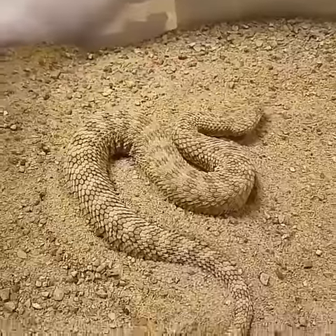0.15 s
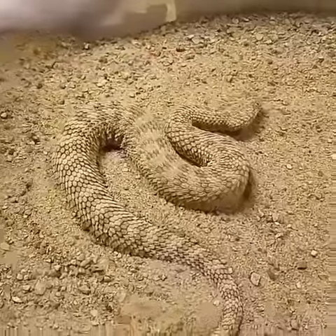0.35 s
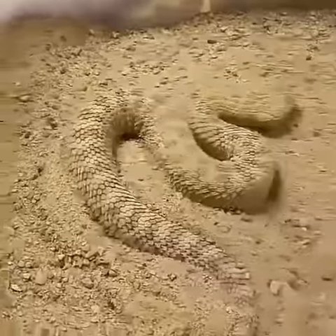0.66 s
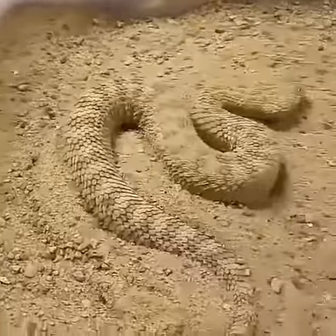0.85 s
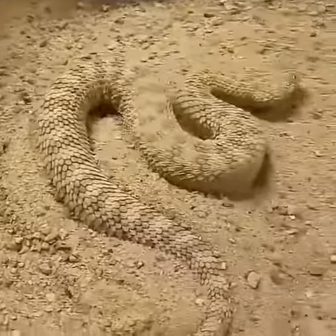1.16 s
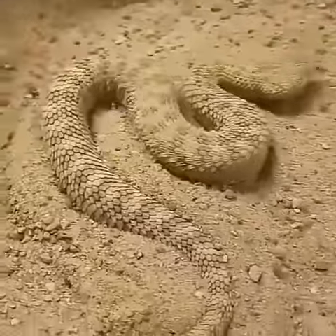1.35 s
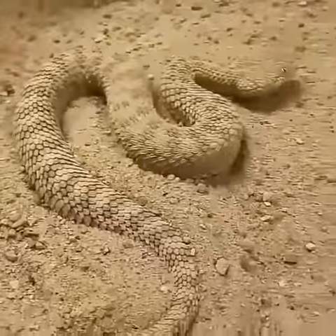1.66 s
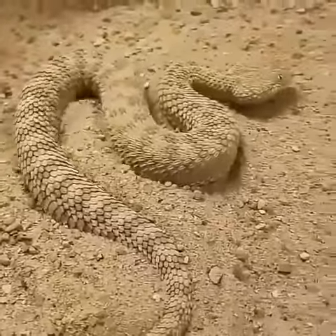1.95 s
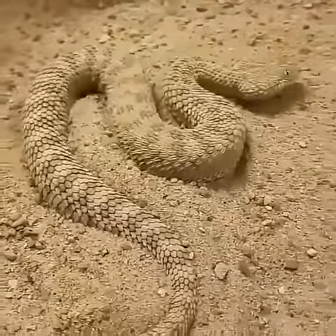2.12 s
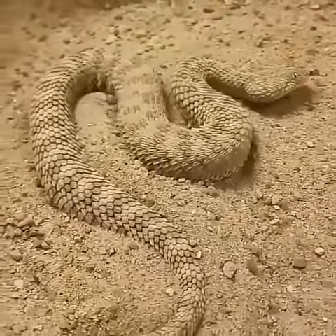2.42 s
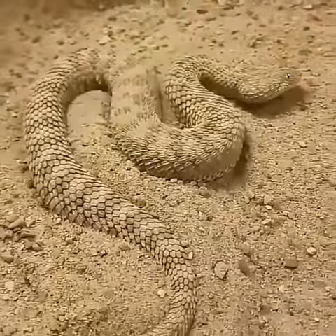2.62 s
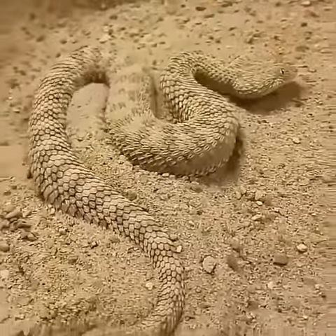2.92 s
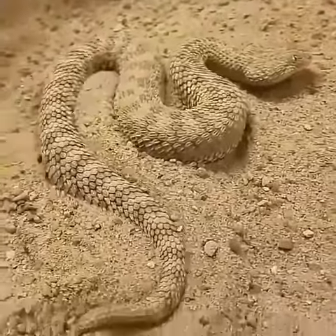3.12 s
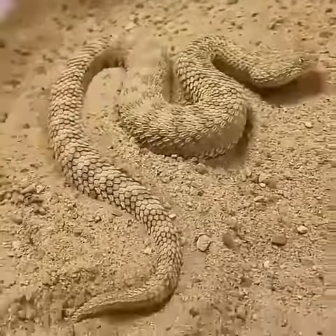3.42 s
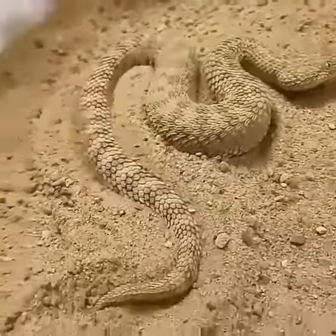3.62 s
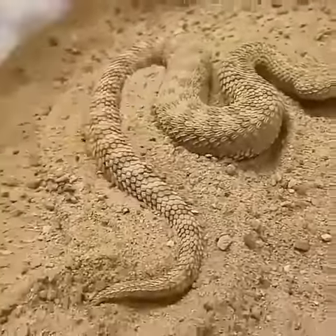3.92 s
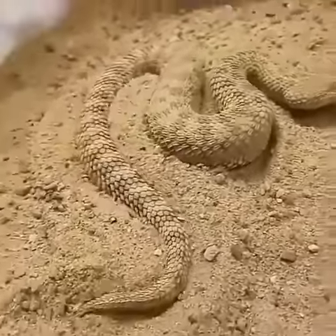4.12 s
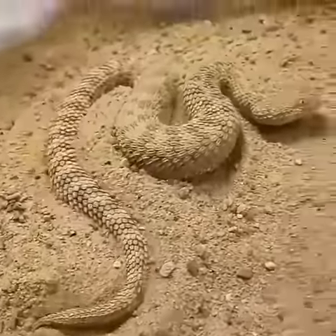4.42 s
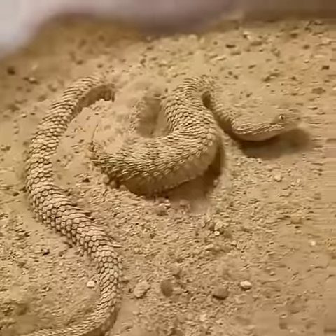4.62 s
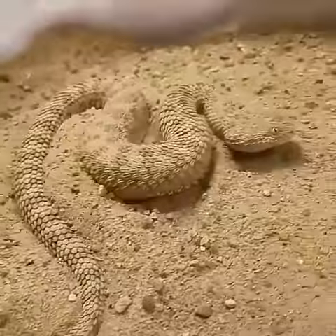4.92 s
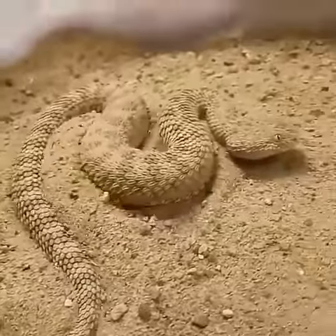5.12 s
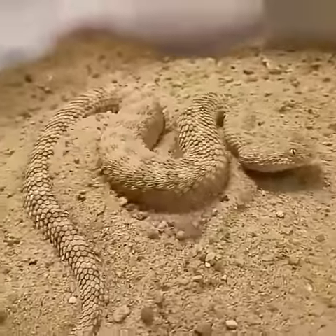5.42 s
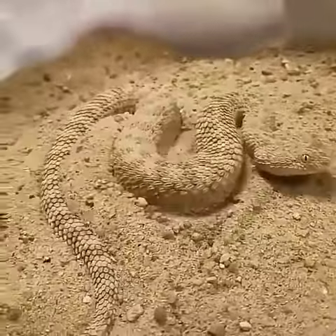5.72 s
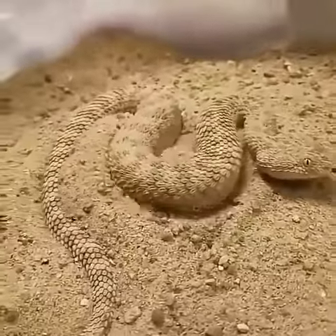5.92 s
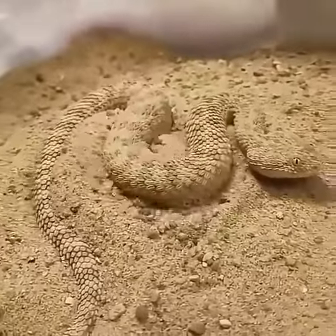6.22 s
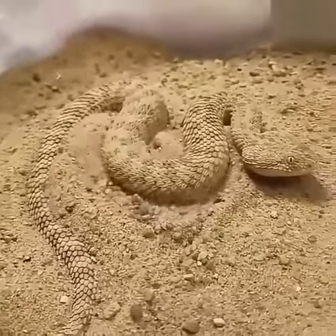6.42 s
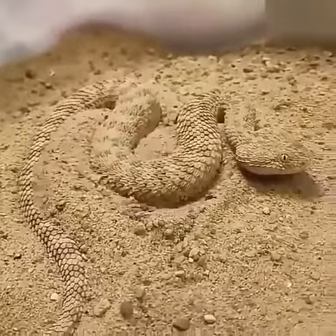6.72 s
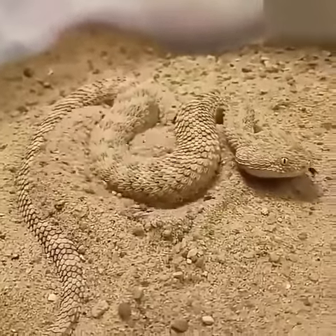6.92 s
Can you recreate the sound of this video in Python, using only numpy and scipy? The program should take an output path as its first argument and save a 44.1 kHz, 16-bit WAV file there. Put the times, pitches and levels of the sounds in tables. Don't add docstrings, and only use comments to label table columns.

```python
import sys
import numpy as np
from scipy import signal
from scipy.fft import rfft, irfft, next_fast_len
from scipy.io import wavfile
from scipy.ndimage import uniform_filter1d

SR = 44100
rng = np.random.default_rng(int(sys.argv[2]) if len(sys.argv) > 2 else 0)


def nominal_scale(level):
    x = np.asarray(level, float) / 20
    return 10 ** x


def master(y):
    cut = np.clip(np.atleast_2d(y).T, -1, 1)
    pcm = np.round(cut * 32767)
    wavfile.write(sys.argv[1], SR, pcm.astype(np.int16))


N = 311346

# frequency in Hz, gain in dB.
CASING_COLOUR = [(130, -43.5), (220, 3), (266, -1.5), (422, 1), (615, -3.5), (911, -2), (1500, -11),
                 (2070, -11), (3710, -19), (4880, -10.5), (6310, -12.5), (7880, -23.5), (12100, -21),
                 (13200, -19.5)]
# start in seconds, length in seconds, scrape in dB, weight and speed in dB against the scrape.
DRAGS = [(.428, 0.084, -49, -9, -8.5), (.688, 0.021, -50, -9, -10.5), (.918, 0.21, -49, -2, 4),
         (1.24, 0.091, -44, 1, 0), (1.335, 0.096, -51.5, 8, 0.5), (1.586, 0.098, -41.5, 7, -3),
         (1.846, 0.054, -43.5, 6.5, -1), (1.985, .02, -68, 8, -2), (2.912, 0.023, -65.5, 2, 2),
         (2.962, 0.032, -59.5, -11, 0.5), (3.71, 0.12, -55.5, -9, 3.5), (4.187, 0.059, -44.5, 0, 2),
         (4.21, 0.044, -42.5, 4.5, 4.5), (4.264, 0.011, -44, -2, -24), (4.28, 0.12, -55.5, -1.5, -2.5),
         (4.654, 0.041, -62.5, 12.5, -8)]
SWELLS = [(.52, 0.12, -47, -13, -8.5), (.73, .175, -50.5, -4.5, 0.5), (1.17, 0.025, -50, 2, 8.5),
          (1.43, 0.092, -48, 10, -2), (1.475, 0.033, -53.5, 6, 6.5), (1.72, 0.088, -60, 0, -1.5),
          (1.865, .11, -45.5, -7, 2.5), (3.0, 0.044, -64, 5, 6), (3.09, 0.065, -61, -4, 3),
          (3.52, 0.22, -57, -2, -12), (3.81, 0.066, -57.5, -4, 8.5), (3.82, 0.15, -51.5, -7, -5),
          (4.39, 0.065, -55.5, 1, -5.5), (4.455, .055, -54.5, 4, -5.5), (5.14, 0.22, -72.5, 11, 5.5),
          (5.42, .05, -70, 0, 9), (5.78, 0.056, -69.5, -3, 5)]
SHOVES = [
    (.655, 0.027, -60, 5, -2),
    (.99, .25, -47, 0.5, -1),
    (1.5, 0.091, -39, 5.5, -2.5),
    (1.82, 0.027, -64, 0, 5),
    (3.18, 0.063, -69, 0, 3),
    (3.6, 0.118, -53, -2.5, 1),
    (3.97, 0.16, -60.5, -4, -4),
    (4.13, 0.075, -50.5, 3.5, -1),
    (4.53, 0.097, -56, -2.5, -17),
    (4.69, 0.05, -60.5, 7.5, -8),
]
# share of the length before the top, start in dB and end in dB under the top.
DRAG_SHAPE = (0.11, -8.5, -4)
SWELL_SHAPE = (0.53, -5.5, -11)
SHOVE_SHAPE = (0.68, -15, -1.4)
# start in seconds, peak in dB, ring in Hz, 60 dB decay in seconds.
KNOCKS = [(.2405, -51, 785, .0094), (0.253, -44, 497, .009), (0.4154, -37, 328, .012),
          (0.4274, -30, 350, .006), (0.6816, -22, 880, 0.0023), (0.6834, -29.5, 350, 0.014),
          (.6925, -35.5, 755, 0.0087), (0.7533, -33.5, 340, 0.011), (1.8472, -22.5, 283, 0.024),
          (2.9555, -27, 510, 0.0031), (3.249, -40.5, 720, 0.005), (3.5955, -38, 700, 0.0042),
          (3.853, -39, 410, .01), (3.8709, -36, 710, 0.0067), (4.259, -21.5, 402, 0.0064),
          (4.4156, -39, 600, .008), (4.4487, -32, 347, 0.0082), (4.5063, -33, 497, 0.0076),
          (4.6371, -29.5, 840, 0.0096)]
# start in seconds, peak in dB, ring in Hz, 60 dB decay in
# seconds.
BUMPS = [(0.424, -34, 150, 0.043), (0.681, -39, 103, 0.063), (1.558, -42, 45, .11),
         (1.942, -33.5, 71.4, 0.1), (2.9549, -28.5, 106, .038), (3.2486, -34.5, 126, 0.019),
         (4.2604, -21.5, 114, 0.043), (4.448, -32, 95, 0.068), (4.497, -51, 60, .043),
         (4.638, -34.5, 97, 0.027), (5.249, -47, 100, .05), (6.078, -41, 98, 0.046),
         (6.3039, -29, 130, 0.025), (6.919, -38, 122, 0.05)]
# start in seconds, peak in dB, ring in Hz, 60 dB decay in seconds.
SLAPS = [
    (0.4188, -16, 783, 0.0047),
    (.4204, -30, 363, .008),
]
# frequency in Hz, level in dB against the blow, 60 dB decay in seconds.
WALL_MODES = [(1460, -27, 0.0019), (1966, -10.5, 0.0094), (2540, -21, 0.0054), (3250, -25, 0.0046),
              (4620, -24.5, 0.011), (7160, -53, 0.0061), (11000, -46, .003)]
# middle in seconds, reach in seconds, level in dB.
SWAYS = [
    (1.6, .12, -67),
    (2.42, .2, -54),
    (3.13, .15, -58),
    (3.52, .2, -53),
    (3.86, .15, -50),
    (4.2, 0.36, -51.5),
    (4.52, 0.19, -45),
    (5.55, .3, -53),
    (6.6, 1.2, -61.5),
]
# time in seconds, level of the hum in dB.
PORT_OPENING = [
    (0.0, -54.5),
    (0.98, -61.5),
    (1.27, -57),
    (1.37, -44.5),
    (1.51, -49),
    (4.46, -47.5),
    (6.43, -48.5),
    (6.51, -48),
    (6.62, -49),
    (7.06, -48),
]
# frequency in Hz, width in Hz, level in dB against the hum, steady share from 0 to 1.
MOTOR_LINES = [(118.2, 6.4, -10.5, 0.87), (198.5, 9.4, 0, 0.97), (248.5, 15, -13, 0.44),
               (269, 20, -6.5, 0.94), (404, 18.5, -14.5, 0.19), (463, 6, -19.5, 0.37),
               (175.7, 16, -16.5, 0), (571, 5.2, -29.5, 0.4), (634, 6.3, -24, 0.91)]
# frequency in Hz, gain in dB.
ROOM_SPECTRUM = [(15, -50), (25, -16.5), (146, -10), (199, -4), (275, 1), (344, -11.5), (637, -19),
                 (1500, -34), (1950, -39), (3300, -120)]
# frequency in Hz, gain in dB.
HISS_SPECTRUM = [(530, -8), (900, -2), (1180, -11.5), (2110, -10), (3790, -15), (4640, -15.5),
                 (8600, -29.5), (9950, -22), (13200, -23)]
# frequency in Hz, threshold in dB against the neighbouring
KEPT_MARGIN = [(700, -14), (1500, -9), (3000, -1), (5000, 0.5), (6400, 0.5), (7600, 3.5), (8600, 3.5),
               (10000, -1), (13000, -0.5)]

SETTLE_S, SETTLE_DB = 0.034, -33.5
STIR_S = 0.018
FIZZ_DB, FIZZ_PER_SPEED = -8, 1.5
FIZZ_PER_LEVEL, FIRM_DB = 0.28, -47.5
TURN_S, TURNED_DB = 2.5, -3.5
KNOCK_RISE_MS, BUMP_RISE_MS, SLAP_RISE_MS = 0.5, 0.96, 7
STILL_DB, REACH_DB = -77, -12.5
ROOM_DB, HISS_DB = -5, -65


def evened(x):
    return x / np.sqrt(np.mean(x ** 2) + 1e-20)


def read(points, hz):
    f, value = np.transpose(points)
    return np.interp(np.log(hz + 1), np.log(f + 1), value)


def add(mix, s, sound):
    part = mix[round(s * SR):][:len(sound)]
    part += sound[:len(part)]


def band(x, lo_hz, hi_hz):
    sos = signal.butter(2, [lo_hz, hi_hz], "band", fs=SR, output="sos")
    return evened(signal.sosfilt(sos, x))


def colour(x, points):
    hz = np.abs(np.fft.fftfreq(4096, 1 / SR))
    log_gain = np.log(nominal_scale(read(points, hz)))
    taps = np.fft.ifft(np.exp(np.conj(signal.hilbert(log_gain)))).real
    return signal.oaconvolve(x, taps[:2048])[:len(x)]


def drift(rate_hz):
    size = next_fast_len(N)
    hz = np.fft.rfftfreq(size, 1 / SR)
    spectrum = rfft(rng.standard_normal(size)) / (1 + (hz / rate_hz) ** 2)
    return evened(irfft(spectrum, size)[:N])


def noise(points, patchy_db, flicker_db):
    frames, hz = N // 256 + 5, np.fft.rfftfreq(1024, 1 / SR)
    a, b, patches = rng.standard_normal((frames, 513, 3)).T
    patches = uniform_filter1d(patches, size=12, axis=0)
    patches = evened(uniform_filter1d(patches, size=10, axis=1))
    flicker = evened(uniform_filter1d(rng.standard_normal(frames), size=3))
    level_db = read(points, hz)[:, None] + patchy_db * patches + flicker_db * flicker
    z = (a + 1j * b) * nominal_scale(level_db)
    return evened(signal.istft(z, nperseg=1024, noverlap=768)[1][:N])


def slips(per_s, spread_db):
    size_db = spread_db * np.minimum(rng.exponential(1, N), 4)
    size = nominal_scale(size_db) * rng.choice([-1., 1.], N)
    return colour(size * (rng.random(N) < per_s / SR), CASING_COLOUR)


def slides():
    power = np.zeros((4, N))
    kinds = ((DRAGS, DRAG_SHAPE), (SWELLS, SWELL_SHAPE), (SHOVES, SHOVE_SHAPE))
    for rows, (top, start_db, end_db) in kinds:
        for start, length, scrape_db, weight_db, speed_db in rows:
            t = np.arange(0, length + SETTLE_S, 1 / SR)
            corners = [0, top * length, length, length + SETTLE_S]
            shape_db = np.interp(t, corners, [start_db, 0, end_db, end_db + SETTLE_DB])
            onset = np.minimum(t / min(STIR_S, top * length / 2), 1)
            level = nominal_scale(scrape_db + shape_db) * onset
            fizz_db = FIZZ_DB + FIZZ_PER_SPEED * speed_db
            fizz_db += FIZZ_PER_LEVEL * (scrape_db - FIRM_DB) + TURNED_DB * (start > TURN_S)
            for layer, rel_db in zip(power, (0, weight_db, speed_db, fizz_db)):
                add(layer, start, (level * nominal_scale(rel_db)) ** 2)
    return np.sqrt(power)


def rubbing():
    clumps = drift(rate_hz=11.5)
    coarse = slips(per_s=1200, spread_db=-0.5) * nominal_scale(1.66 * clumps + 0.45 * drift(rate_hz=43))
    fine = slips(per_s=12000, spread_db=3.5) * nominal_scale(3.0 * clumps + 0.09 * drift(rate_hz=31))
    rumble = nominal_scale(-14) * band(rng.standard_normal(N), 37, 214)
    scrape = band(coarse, 705, 1685) + rumble
    weight = -band(coarse, 231, 590)
    grit = band(fine, 1520, 4600)
    fizz = band(fine, 8000, 12570)
    return (np.array([scrape, weight, grit, fizz]) * slides()).sum(0)


def knocks():
    body, edge, t = np.zeros(N), np.zeros(N), np.arange(6000) / SR
    kinds = ((KNOCKS, KNOCK_RISE_MS, 1), (BUMPS, BUMP_RISE_MS, -1), (SLAPS, SLAP_RISE_MS, 1))
    for rows, rise_ms, swing in kinds:
        for s, peak_db, hz, t60 in rows:
            rise = 1 - np.exp(-t * 1000 / rise_ms)
            ring = rise * nominal_scale(-60 * t / t60) * np.sin(2 * np.pi * hz * t)
            add(body, s, swing * nominal_scale(peak_db) * ring / abs(ring).max())
            sharpness = nominal_scale(1.36 * peak_db + 5) * (hz / 800) ** 1.2
            add(edge, s + 0.44 / hz, np.array([swing * sharpness]))
    wall = sum(nominal_scale(db - 60 * t / t60) * np.sin(2 * np.pi * hz * t) for hz, db, t60 in WALL_MODES)
    snap = signal.oaconvolve(edge, wall)[:N]
    shaken = signal.oaconvolve(abs(edge), nominal_scale(-60 * t / 0.029))[:N]
    rattle = nominal_scale(-25.5) * shaken * evened(slips(per_s=2000, spread_db=-2.0))
    return body + snap + rattle


def hand():
    t = np.arange(N) / SR
    sway = nominal_scale(STILL_DB)
    for s, reach, level_db in SWAYS:
        sway = sway + nominal_scale(level_db + REACH_DB * abs(t - s) / reach)
    lumps = nominal_scale(-5.5 + 3.1 * drift(rate_hz=6.7))
    return sway * lumps * band(rng.standard_normal(N), 30, 108)


def room():
    t, hum = np.arange(N) / SR, 0
    for hz, width_hz, level_db, steady in MOTOR_LINES:
        waver = drift(width_hz) + 1j * drift(width_hz)
        flutter = np.sqrt(steady) + np.sqrt((1 - steady) / 2) * waver
        hum = hum + nominal_scale(level_db) * np.sqrt(2) * (flutter * np.exp(2j * np.pi * hz * t)).real
    air = nominal_scale(ROOM_DB) * noise(ROOM_SPECTRUM, patchy_db=1.73, flicker_db=0.6)
    s, port_db = np.transpose(PORT_OPENING)
    return nominal_scale(np.interp(t, s, port_db)) * (hum + air)


def hiss():
    return nominal_scale(HISS_DB) * noise(HISS_SPECTRUM, patchy_db=1.64, flicker_db=2.0)


def scene():
    return (rubbing() + knocks() + hand() + room() + hiss())[None]


def thinned(x):
    grid = dict(window="cosine", nperseg=2048, noverlap=1024)
    hz, t, z = signal.stft(x, SR, **grid)
    around = np.exp(uniform_filter1d(np.log(abs(z) + 1e-9), size=161, axis=0))
    draws = rng.standard_normal((len(t), 43, 2)).T
    thrift, slack = draws.repeat(24, axis=1)[:, :len(hz)]
    thrift = evened(uniform_filter1d(thrift, size=2, axis=1))
    uneven_db = np.interp(hz, [5000, 7000], [3, 5.5])[:, None] * thrift
    kept = abs(z) > around * nominal_scale(read(KEPT_MARGIN, hz)[:, None] + uneven_db)
    rough = nominal_scale(3.2 * slack * (hz > 7700)[:, None])
    z = z * kept * rough * (hz < 13180)[:, None]
    return signal.istft(z, SR, **grid)[1][:N]


def low_pass(x):
    return signal.sosfilt(signal.butter(12, 13320, fs=SR, output="sos"), x)


def record(dry):
    mix = thinned(dry[0])[None] - 0.0005
    return low_pass(mix)


dry = scene()
out = record(dry)
master(out)
```